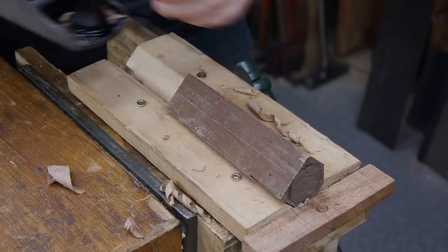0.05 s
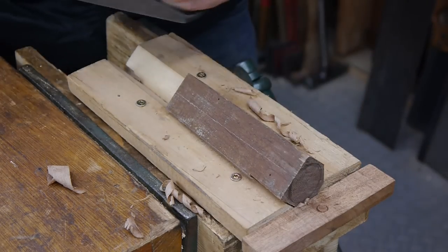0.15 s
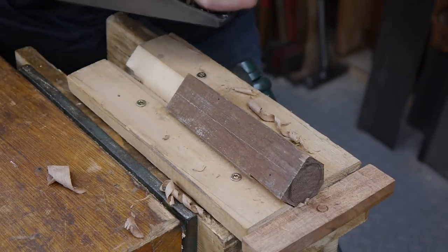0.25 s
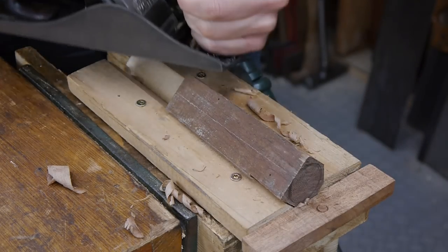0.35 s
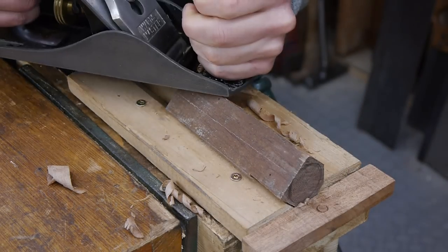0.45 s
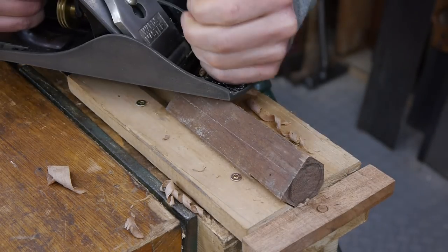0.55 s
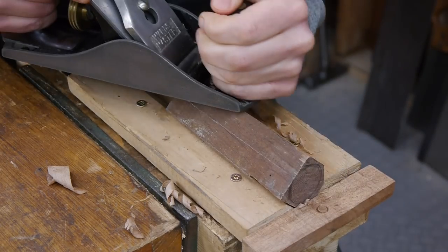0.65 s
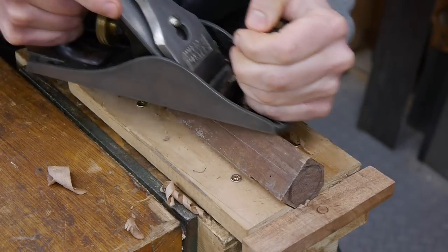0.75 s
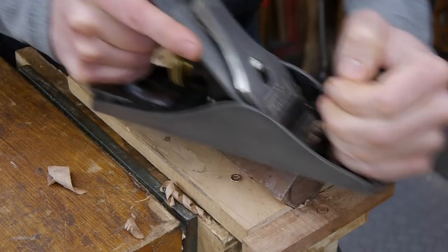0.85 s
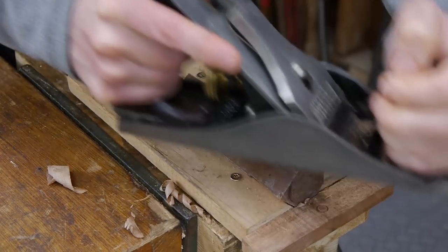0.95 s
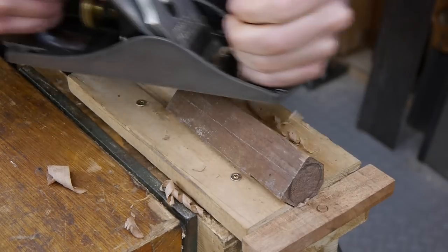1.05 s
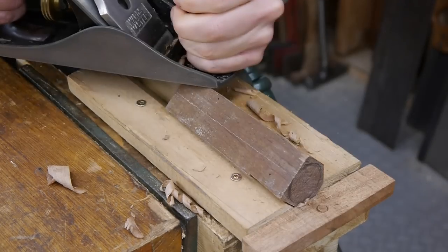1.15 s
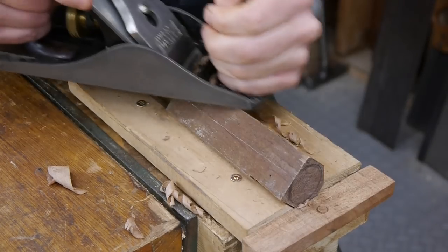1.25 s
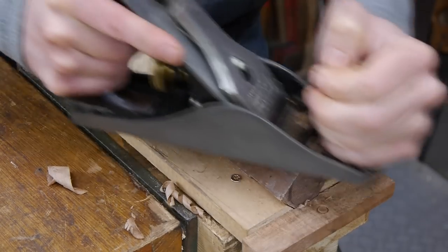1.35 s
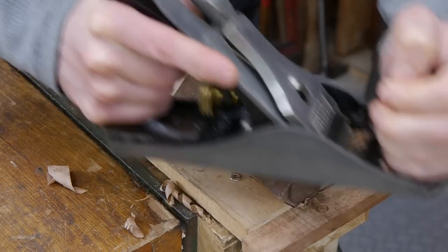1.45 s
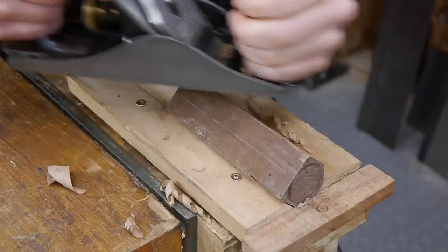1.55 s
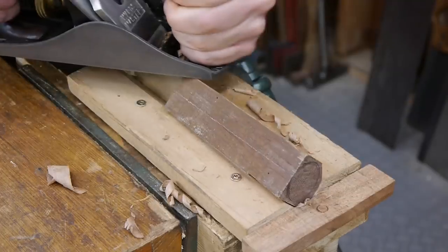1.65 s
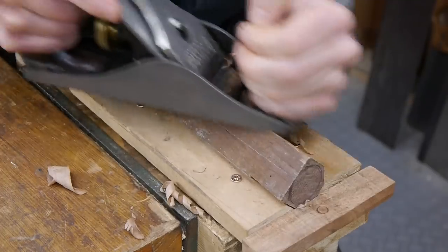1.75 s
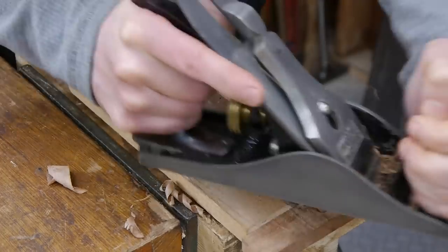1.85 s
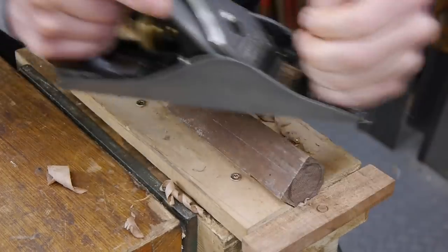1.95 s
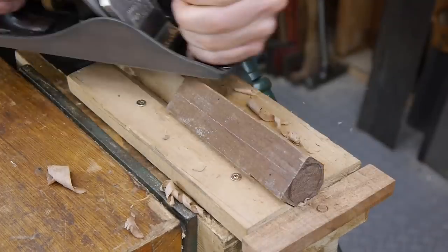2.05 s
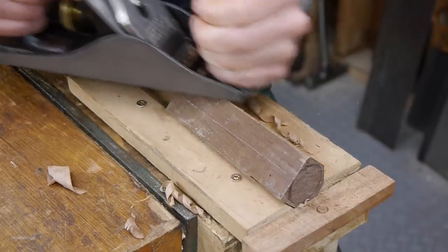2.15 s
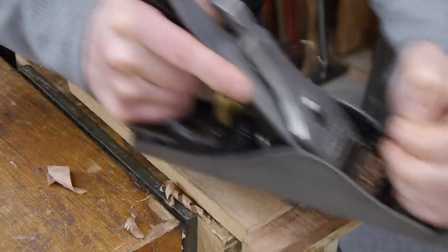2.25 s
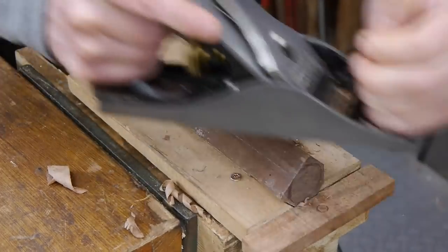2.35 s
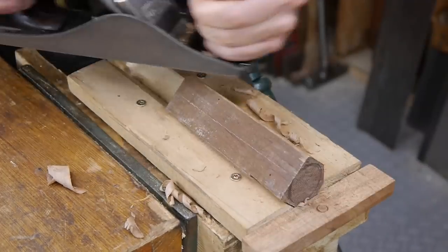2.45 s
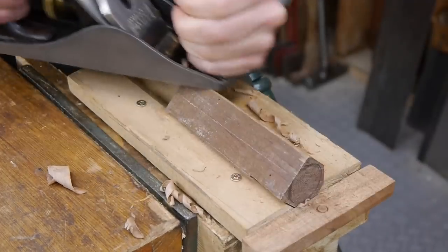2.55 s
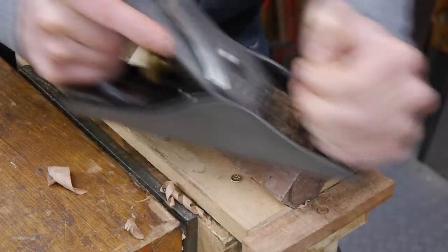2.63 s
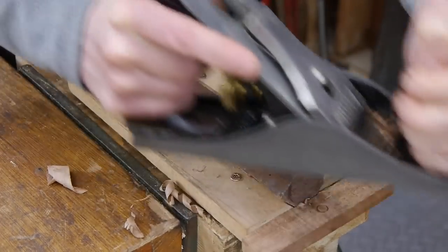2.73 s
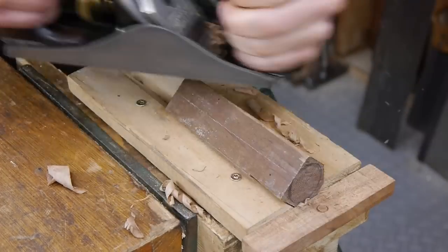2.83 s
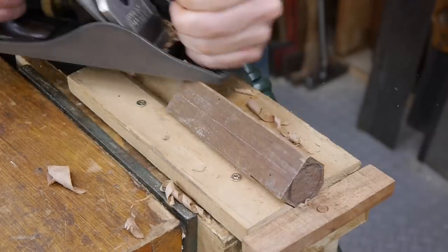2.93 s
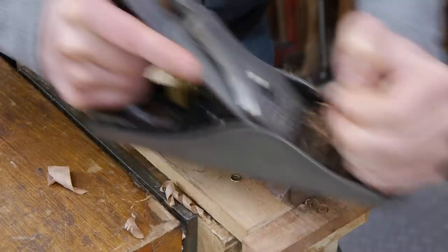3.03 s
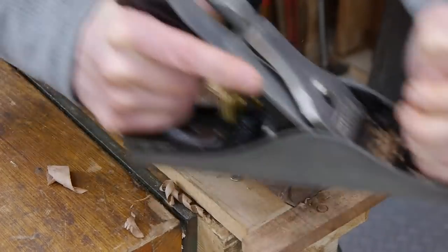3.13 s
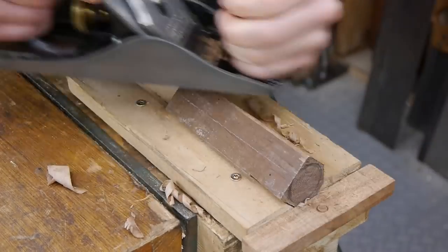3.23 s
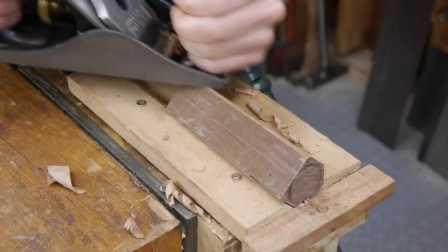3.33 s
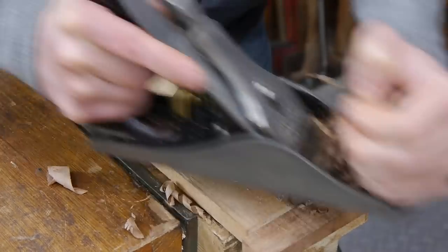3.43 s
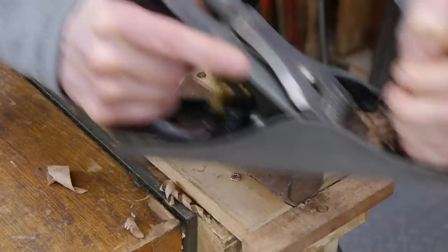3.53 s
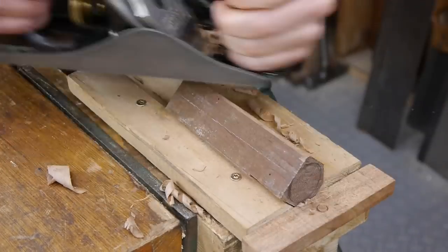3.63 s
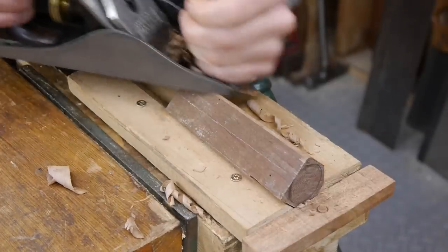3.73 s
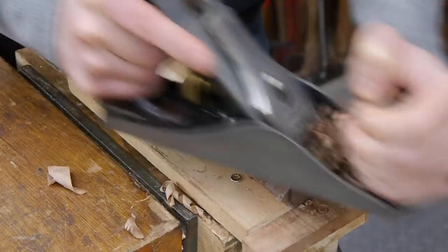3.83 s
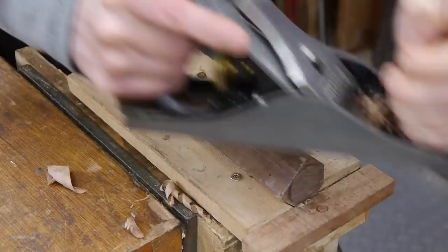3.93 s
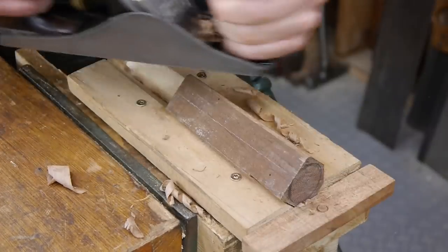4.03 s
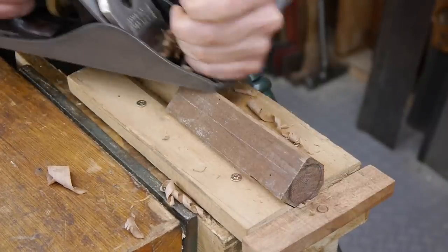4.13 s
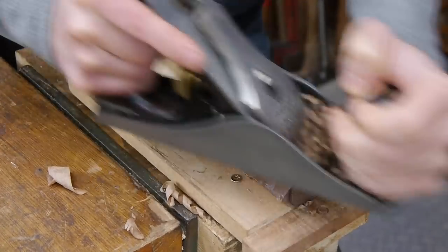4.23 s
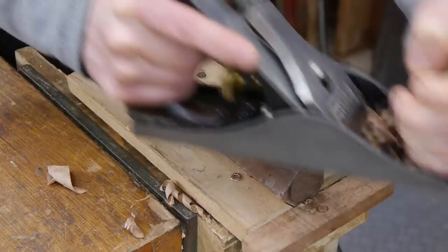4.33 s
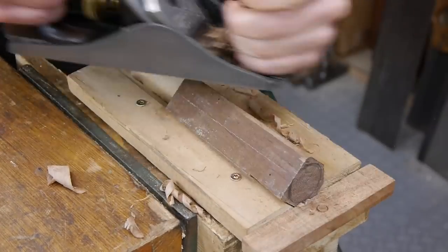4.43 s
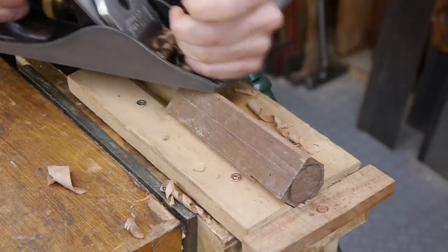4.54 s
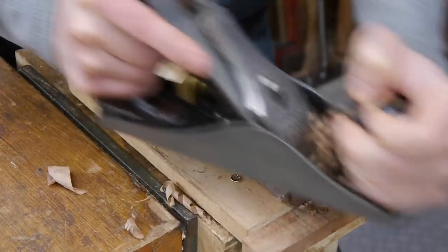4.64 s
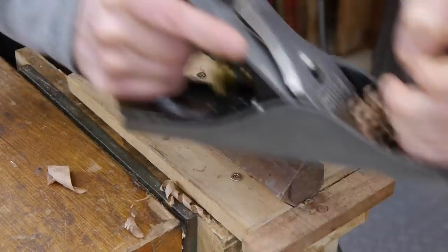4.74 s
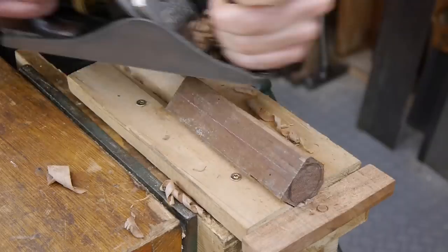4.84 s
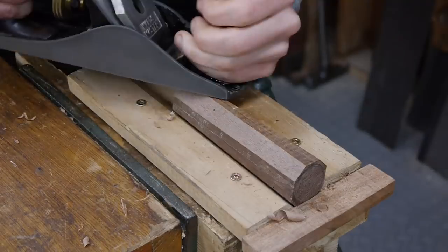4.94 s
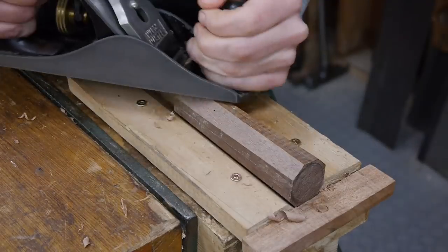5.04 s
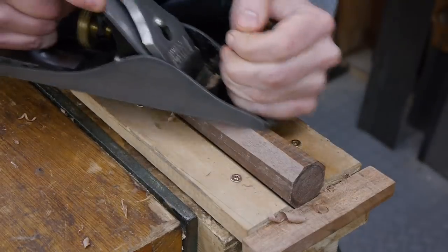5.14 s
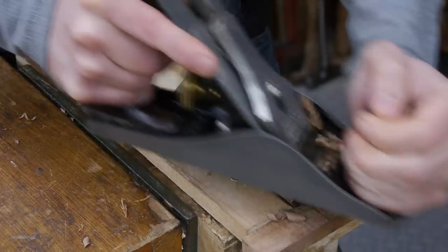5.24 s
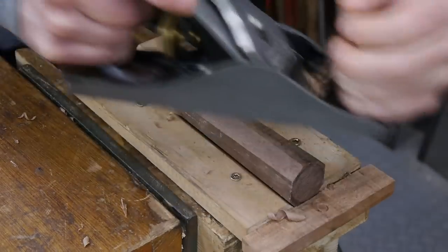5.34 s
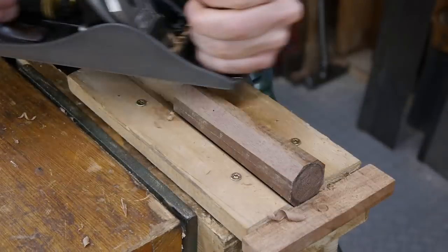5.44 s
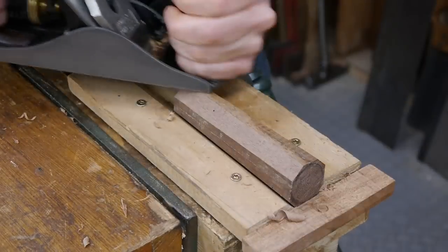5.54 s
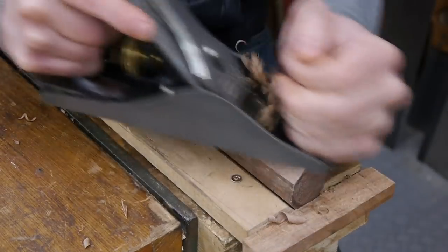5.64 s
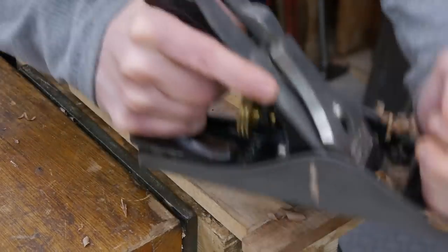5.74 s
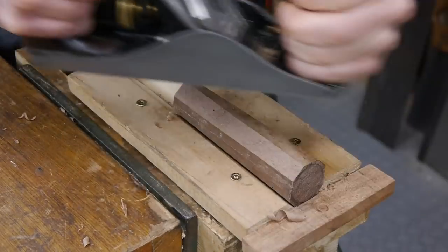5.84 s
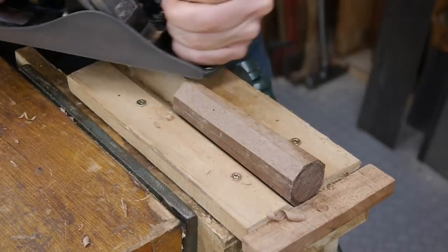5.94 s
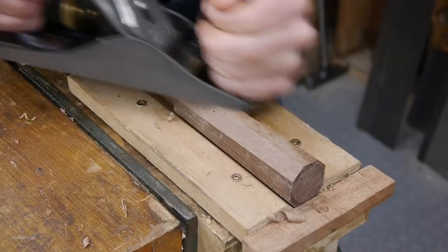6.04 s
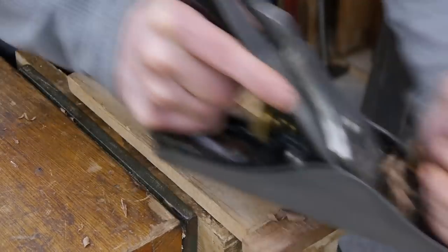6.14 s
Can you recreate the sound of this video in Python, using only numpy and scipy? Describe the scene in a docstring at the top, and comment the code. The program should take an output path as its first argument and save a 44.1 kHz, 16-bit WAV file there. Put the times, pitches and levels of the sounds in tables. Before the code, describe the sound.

Close in a small, fairly dry workshop, a cast-iron hand plane works a hardwood blank. After half a second of quiet, a slow, soft first stroke scrapes and judders, then strokes quicken to over two a second. Each is a clack of iron on wood, brief rub, harsh tearing rasp with bright hiss, dull thump, and knock as the plane lifts.

```python
"""A cast-iron hand plane takes thirteen strokes off a hardwood blank held by a bench stop in a small workshop.
The sole lands with a clack and slides, then the blade bites and tears a shaving; the blank thumps at run-out
and the plane knocks as it rocks, catches, lifts and jolts at the bite. Contacts are noise bursts and random
grains ringing through shared resonances of iron and wood; one judder is a wavering sine. Shifting reflections
and a bench-top glance give the room, over a bed of quiet air and hiss."""
import sys
import numpy as np
from scipy import signal
from scipy.fft import rfft, irfft
from scipy.io import wavfile

SR = 44100
rng = np.random.default_rng(int(sys.argv[2]) if len(sys.argv) > 2 else 0)


def output_pcm(signal):
    """Save a mono or channel-first signal as 16-bit PCM at the path in sys.argv[1].

    Samples are clipped to [-1, 1] before scaling.
    """
    pcm = np.clip(np.atleast_2d(signal).T, -1, 1) * 32767
    wavfile.write(sys.argv[1], SR, np.round(pcm).astype(np.int16))


N = 272538
TIME = np.arange(N) / SR   # s
TAPS = 8192   # filter and burst length in samples
BIN_HZ = np.maximum(np.arange(TAPS // 2 + 1) * SR / TAPS, 1)


def from_db(db):
    """Decibels to gain."""
    return 10 ** (np.asarray(db) / 20)


def rms_one(x):
    """Scale to rms 1."""
    return x / np.sqrt(np.mean(x ** 2) + 1e-20)


def at_hz(points, hz):
    """Read a spectrum table on a log-frequency axis."""
    points = np.array(points)
    return np.interp(np.log(hz), np.log(points[:, 0]), points[:, 1])


def flutter(rate):
    """Random wander of rms 1 through `rate` new values a second."""
    values = rng.standard_normal(N // 20)
    return rms_one(np.interp(TIME * rate, np.arange(N // 20), values))


def shape(x, level_db):
    """Causal (minimum-phase) filter of unit power with the given relative dB in each bin."""
    cepstrum = irfft(np.log(from_db(level_db)))
    # fold the cepstrum forward in time so the filter never rings early
    cepstrum[1:TAPS // 2] *= 2
    cepstrum[TAPS // 2 + 1:] = 0
    response = irfft(np.exp(rfft(cepstrum)))
    return signal.fftconvolve(x, response / np.linalg.norm(response))[:N]


# resonances of blank, bench and iron body, negative lift for a dip: f/Hz, width/Hz, lift level/dB
BODY_MODES = [(138, 5.9, 13.5), (188, 16.4, 7.5), (264.5, 20, 3.5), (309, 26, 4.5), (384.5, 18, 7.5),
              (520.5, 44, 7.5), (601, 15, 2.5), (915.6, 12, 7.5), (1145, 39, 1.5), (1462, 54, 9.5),
              (1539.7, 28, 8), (1581, 54, 6), (1705, 76, 10.5), (1861, 31, 5.5), (1972, 100, 7),
              (2266, 44, 8), (2360, 43, 4), (2417, 73, 4.5), (2517, 88, 5.5), (2745, 88, 5.5),
              (2864, 26, 2.5), (3333, 130, 4), (3519, 31, 3), (3600, 13, -9), (4580, 730, 5.5),
              (5470, 49, -0.5), (6940, 146, 4.5), (8340, 157, 11), (10190, 560, 8), (12120, 410, 6.5),
              (14700, 450, -5)]


def body(force, colour):
    """A contact force of some colour rings through the resonances of plane and wood."""
    level_db = at_hz(colour, BIN_HZ)
    for hz, width, lift_db in BODY_MODES:
        off = (2 * (BIN_HZ - hz) / width) ** 2
        level_db = level_db + 10 * np.log10((off + from_db(lift_db) ** 2) / (off + 1))
    return shape(force, level_db)


def grains(per_s, spread_db):
    """Random tiny fractures of uneven size and either sign; rms 1."""
    size_db = spread_db * np.minimum(rng.exponential(1, N), 4)
    sizes = from_db(size_db) * rng.choice([-1, 1], N)
    return rms_one(sizes * (rng.random(N) < per_s / SR))


def blows(times, levels_db, rise, t60, delay):
    """Each blow is a burst of micro-contacts that swells and dies away (rise, t60 and delay in s)."""
    force, age = np.zeros(N + SR), TIME[:TAPS]
    for s, level_db in zip(times, levels_db):
        start = int((s + delay) * SR)
        swell = 1 - np.exp(-age / rise)
        force[start:start + TAPS] += from_db(level_db - 60 * age / t60) * swell
    return force[:N] * rng.choice([-1, 1], N)


# colour of air and hiss: f/Hz, relative level per Hz/dB
AIR_COLOUR = [(15, -36.5), (25, 2.5), (48, -0.5), (86, -5.5), (359, -3.5), (421, -4), (614, -0.5),
              (666, -3.5), (722, -2), (1200, -2.5), (3930, -10), (7700, -14), (15500, -9)]
# slow level offsets of the background noise: t/s, offset level/dB
BACKGROUND_LEVEL = [(0.43, -1), (0.5, -5), (0.6, -6), (0.65, 0.5)]
BACKGROUND_BASE_DB = -59   # before the offsets above


def background(side_db):
    """Quiet room air and microphone hiss: coloured noise, independent in mid and side, with slow level offsets."""
    mid, side = (shape(rng.standard_normal(N), at_hz(AIR_COLOUR, BIN_HZ)) for channel in range(2))
    level_db = BACKGROUND_BASE_DB + np.interp(TIME, *np.transpose(BACKGROUND_LEVEL))
    return from_db(level_db) * (mid + from_db(side_db) * side * [[1], [-1]])


# the sole lands on the blank, levels before the layer trims:
# t/s, ring level/dB, bench thud level/dB, crack level/dB, rub level of the following slide/dB
LANDINGS = [(0.5094, -32.5, -44.5, -64, -43), (1.1783, -13.5, -35.5, -35.5, -29.5),
            (1.6853, -13.5, -33, -29.5, -23.5), (2.144, -14, -29.5, -32.5, -24),
            (2.5709, -14.5, -30.5, -31.5, -23), (2.9587, -11, -27, -33, -15.5),
            (3.357, -10.5, -26.5, -31.5, -19), (3.7472, -13, -26, -34.5, -20),
            (4.1578, -8, -28.5, -28, -21), (4.5656, -11.5, -29.5, -31.5, -22.5),
            (4.9756, -18.5, -35, -25, -35), (5.5539, -19.5, -34, -39, -24),
            (6.0221, -12.5, -28.5, -30.5, -24.5)]
# colours of the impact layers, each: f/Hz, relative level per Hz/dB
CRACK_COLOUR = [(1000, -28.5), (4000, -13), (6500, 6.5), (8200, 3), (9200, -5.5), (10800, 3), (13000, -4.5),
                (16000, -0.5)]
SNAP_COLOUR = [(800, -23.5), (2000, -8), (2800, -1.5), (3500, 5.5), (4200, 2.5), (5000, -13), (7000, -24.5),
               (10000, -34.5)]
PING_COLOUR = [(3000, -27), (4600, -6.5), (5300, 2.5), (5600, -1), (6100, -12), (6900, -11), (7600, -14.5),
               (8300, -16), (9500, -31.5)]
CLACK_COLOUR = [(100, -40), (400, 1.5), (750, -7.5), (1200, 4), (1500, 3.5), (2000, -3), (2450, 5),
                (2900, -11), (4000, -46), (9000, -40.5)]
THUD_COLOUR = [(50, -45.5), (130, -34), (250, -11.5), (370, -2), (560, -0.5), (750, -6), (1100, -5.5),
               (3000, -56)]


def landings():
    """Iron meets wood: a sharp crack, the ring and ping of the casting, and the bench answering a moment later."""
    s, ring_db, thud_db, crack_db, _ = np.transpose(LANDINGS)
    crack = body(blows(s, crack_db, rise=0.00044, t60=0.024, delay=0.00078), CRACK_COLOUR)
    snap = body(blows(s, ring_db, rise=0.00074, t60=0.021, delay=0.00065), SNAP_COLOUR)
    ping = body(blows(s, crack_db, rise=0.00099, t60=0.019, delay=0.0015), PING_COLOUR)
    ring = body(blows(s, ring_db, rise=0.00023, t60=0.09, delay=0.00059), CLACK_COLOUR)
    thud = body(blows(s, thud_db, rise=0.0016, t60=0.11, delay=0.0028), THUD_COLOUR)
    bright = from_db(7.5) * crack + from_db(-4.5) * snap + from_db(15) * ping
    return bright + from_db(-7) * ring + from_db(6) * thud


# colours of scraped and torn wood, each: f/Hz, relative level per Hz/dB
CUT_COLOUR = [(200, -35), (750, -39.5), (1100, -14), (1500, 2), (2000, -1), (2700, 2), (4200, -10),
              (5500, -13), (9000, -22)]
SHAVING_COLOUR = [(1500, -35), (3500, 6), (5000, -1.5), (7500, -1.5), (9200, -5), (11000, -4), (13000, 0),
                  (13700, -1), (16000, 0)]
GROAN_COLOUR = [(60, -38), (130, -24), (250, -13), (500, 0), (720, -6.5), (1000, 4), (1250, 4.5),
                (1500, -10.5), (3000, -30.5)]


def sliding():
    """The toe of the sole rubs along the wood, and the rub swells as the blade reaches the blank."""
    pressure = np.zeros(N)
    for s, *_, rub_db in LANDINGS:
        bite_s = min(cut[0] for cut in CUTS if cut[0] > s)
        span = slice(int(s * SR), int(bite_s * SR))
        swell_db = 10 * np.exp((TIME[span] - bite_s) / 0.007)
        pressure[span] = from_db(rub_db + swell_db)
    rub = pressure * grains(per_s=5000, spread_db=2.0)
    scrape = from_db(-21.5) * body(rub, CUT_COLOUR)
    hiss = from_db(-35.0) * body(rub, SHAVING_COLOUR)
    groan = from_db(-24) * body(rub, GROAN_COLOUR)
    return scrape + hiss + groan


# the blade in the wood, mid-cut levels before jolts and layer trims: bite t/s, run-out t/s,
# force level on the plane/dB, shaving hiss level/dB, blank groan level/dB, force growth over the cut/dB,
# blank thump level at run-out/dB
CUTS = [(0.705, 0.920, -35.5, -47, -38.5, 19, -25), (1.309, 1.426, -25.5, -38, -28.5, 7, -26.5),
        (1.785, 1.869, -19.5, -30, -28.5, -1, -42), (2.222, 2.292, -19.5, -26.5, -27.5, 0.5, -25.5),
        (2.647, 2.713, -21, -26, -31, 1.5, -26), (3.033, 3.101, -18, -24.5, -27, -7.5, -23.5),
        (3.427, 3.501, -17.5, -25, -30.5, -5.5, -21.5), (3.820, 3.902, -17, -26, -27, -5.5, -18.5),
        (4.229, 4.307, -18.5, -24.5, -27.5, -4.5, -23.5), (4.630, 4.705, -18.5, -24, -28, -0.5, -25),
        (5.144, 5.208, -36, -43.5, -26.5, 10, -48), (5.209, 5.308, -18.5, -29.5, -27.5, -5, -23),
        (5.645, 5.745, -18, -26, -27.5, -4.5, -17.5), (6.107, 6.185, -21, -23, -24.5, -6, -40)]
ARCH_DB = 0.5   # the push is firmest in the middle of a cut
JOLT_S, RELEASE_S = 0.012, 0.0072   # decay times: the edge first digging in, the shaving coming free


def along_cuts(levels_db, growths_db, jolt_db, bite_s):
    """Gain of the cuts: a jolt at the bite, a steady rise or fall under an arched push, a quick release."""
    gain = np.zeros(N)
    for (bite, run_out, *_), level_db, growth_db in zip(CUTS, levels_db, growths_db):
        span = slice(int(bite * SR), int(run_out * SR) + TAPS)
        age = np.maximum(TIME[span] - bite, 0)
        progress = np.minimum(age / (run_out - bite), 1)
        release = np.exp(-np.maximum(TIME[span] - run_out, 0) / RELEASE_S)
        gate = np.minimum(age / bite_s, 1) * release
        push_db = growth_db * (progress - .5) + ARCH_DB * (np.sin(np.pi * progress) - 1)
        gain[span] += gate * from_db(level_db + push_db + jolt_db * np.exp(-age / JOLT_S))
    return gain


# the edge scratches first, then loads the plane, then the blank
HISS_BITE_S, FORCE_BITE_S, GROAN_BITE_S = 0.004, 0.0092, 0.01
JOLT_FORCE_DB, JOLT_HISS_DB, JOLT_GROAN_DB = 0.5, 1, 5.5   # extra level as the edge digs in
SPEED_UP_DB, HISS_FOLLOWS = 7.5, 0.8   # hiss growth as the plane gathers speed, and share of the force's growth
GROAN_SAG_DB = 4.5   # the blank settles against the stop during the cut
TEAR_PER_S, TEAR_SPREAD_DB = 20000, 1.5
WAVER_DB, WAVER_PER_S = 1, 45   # uneven grain along the blank


def cutting():
    """Fibres snap in quick uneven clumps: the plane shakes, the blank groans and the shaving hisses out of the mouth."""
    _, _, force_db, hiss_db, groan_db, growth_db, _ = np.transpose(CUTS)
    clumps = from_db(1.6 * flutter(130) + 1.2 * flutter(700))

    force = along_cuts(force_db, growth_db, JOLT_FORCE_DB, FORCE_BITE_S)
    force = force * rms_one(clumps * grains(per_s=3500, spread_db=0.0))

    tearing = along_cuts(hiss_db, SPEED_UP_DB + HISS_FOLLOWS * growth_db, JOLT_HISS_DB, HISS_BITE_S)
    waver = from_db(WAVER_DB * flutter(WAVER_PER_S))
    tearing = tearing * rms_one(np.sqrt(clumps) * waver * grains(TEAR_PER_S, TEAR_SPREAD_DB))

    dragging = along_cuts(groan_db, np.full(len(CUTS), -GROAN_SAG_DB), JOLT_GROAN_DB, GROAN_BITE_S)
    dragging = dragging * rms_one(clumps * grains(per_s=2500, spread_db=3.0))

    shake = from_db(-0.68) * body(force, CUT_COLOUR)
    hiss = from_db(2.0) * body(tearing, SHAVING_COLOUR)
    groan = from_db(-1.0) * body(dragging, GROAN_COLOUR)
    return shake + hiss + groan


JUDDER_S, JUDDER_LENGTH_S = 0.772, 0.055   # centre of the swell, and its width between 1/e points
JUDDER_HZ, JUDDER_DB = 532, -31   # centre pitch and level, both of which waver


def judder():
    """On the slow first stroke, stick and slip lock briefly onto a resonance of the blank: a short wavering sine."""
    pitch_hz = JUDDER_HZ * (1 + 0.0247 * flutter(120))
    phase = 2 * np.pi * np.cumsum(pitch_hz) / SR
    swell = np.exp(-(2 * (TIME - JUDDER_S) / JUDDER_LENGTH_S) ** 2)
    return from_db(JUDDER_DB + 3.4 * flutter(130)) * swell * np.sin(phase)


def thumps():
    """The blank is pushed against the stop and drops back when the blade lets go."""
    _, run_out, *_, thump_db = np.transpose(CUTS)
    return from_db(1) * body(blows(run_out, thump_db, rise=0.0024, t60=0.081, delay=0.0014), THUD_COLOUR)


# duller knocks of the plane rocking, catching, lifting off and jolting as the blade enters, levels before the
# layer trims: # t/s, ring level/dB, wood level/dB, tick level/dB
KNOCKS = [(0.9842, -17, -32.5, -46), (1.222, -43, -30, -59), (1.5006, -17.5, -32, -54.5),
          (1.728, -19.5, -17.5, -48), (1.83, -13, -39, -27), (1.8614, -3, -30, -29),
          (1.9337, -19.5, -32.5, -57), (2.228, -8, -27, -37), (2.353, -19, -32, -60),
          (2.6594, -5, -32, -35), (2.771, -17, -30.5, -48), (3.1621, -11, -19.5, -54),
          (3.549, -6, -19, -36), (3.591, -20, -38, -61), (3.773, -20.5, -28.5, -45),
          (3.9608, -16.5, -33.5, -47), (4.364, -17.5, -33.5, -54), (4.7547, -11, -25, -47),
          (5.0699, -31, -23.5, -34), (5.332, -13, -20.5, -28), (5.6493, -9, -22.5, -31),
          (5.7959, -7, -17, -32)]
# colours of the iron and wood knocks, each: f/Hz, relative level per Hz/dB
KNOCK_COLOUR = [(200, -38.5), (800, -12.5), (1250, 2), (1520, 9), (2000, -2), (2700, -8), (4000, -24),
                (7000, -28.5), (16000, -40)]
WOOD_COLOUR = [(80, -38.5), (200, -16), (480, -3.5), (700, -5.5), (1200, 4.5), (1600, -13), (2600, -16),
               (5000, -33.5), (16000, -49.5)]


def knocks():
    """Duller contacts rattle the plane and the blank, with a small tick on top."""
    s, ring_db, wood_db, tick_db = np.transpose(KNOCKS)
    ring = body(blows(s, ring_db, rise=0.00018, t60=0.053, delay=0.00025), KNOCK_COLOUR)
    wood = body(blows(s, wood_db, rise=0.001, t60=0.14, delay=0.00039), WOOD_COLOUR)
    tick = body(blows(s, tick_db, rise=0.0004, t60=0.03, delay=0.0003), CRACK_COLOUR)
    return from_db(-4.0) * ring + from_db(1.5) * wood + from_db(-0.5) * tick


# decay of the room: f/Hz, time to fall 60 dB t/s
ROOM_T60 = [(150, 0.26), (500, 0.22), (1400, 0.24), (4000, 0.2), (15000, 0.16)]
# width of the reflections: f/Hz, side-to-mid level/dB
REFLECTION_WIDTH = [(100, -17.5), (300, -44.5), (900, -43.5), (1600, -18.5), (2500, -6), (6000, -7),
                    (15000, -6)]


def reflections(first_echo):
    """Mid and side response of the room from one spot: dense, dying faster in the treble and widest there."""
    age, tails = TIME[:2 * TAPS], 0
    hz = np.maximum(np.arange(TAPS + 1) * SR / (2 * TAPS), 1)
    white = np.exp(2j * np.pi * rng.random((2, TAPS + 1)))
    white[1] *= from_db(at_hz(REFLECTION_WIDTH, hz))
    for low in 2.0 ** np.arange(6, 14):   # octave bands from 64 Hz
        band = irfft(white * ((hz >= low) & (hz < 2 * low)))
        tails = tails + band * from_db(-60 * age / at_hz(ROOM_T60, low * np.sqrt(2)))
    tails = tails * (age > first_echo)
    return tails / np.linalg.norm(tails[0])


# stereo imbalance of the glance: f/Hz, side-to-mid level/dB
GLANCE_WIDTH = [(100, -32.5), (1000, -68), (1800, -15.5), (2700, -10), (6000, -11), (15000, -10)]


def workshop(x, wet_db, glance_db):
    """Plane and arms keep moving, so the room's reflections and a glance off the bench top keep changing."""
    # blend four room responses with wandering weights of constant total power
    spots = np.array([flutter(9) for spot in range(4)])
    spots /= np.linalg.norm(spots, axis=0)
    wet = 0
    for near in spots:
        room = reflections(first_echo=0.0033)
        wet = wet + signal.oaconvolve((x * near)[None], room, axes=1)[:, :N]
    mid, side = from_db(wet_db) * wet
    # a copy about 1.2 ms late, its delay wandering
    glance = np.interp(TIME - .0012 - .0003 * flutter(7), TIME, x, left=0)
    mid = mid + x + from_db(glance_db) * glance
    # the glance reaches the two microphones unequally
    unequal_db = at_hz(GLANCE_WIDTH, BIN_HZ)
    side = side + np.sqrt(np.mean(from_db(unequal_db) ** 2)) * shape(glance, unequal_db)
    return np.array([mid + side, mid - side])


RADIATION_HZ = 105   # plane and blank are too small to radiate deep bass


def scene():
    """All sounds of the plane in the room, over its background."""
    plane = landings() + sliding() + cutting() + judder() + thumps() + knocks()
    radiated = signal.sosfilt(signal.butter(2, RADIATION_HZ, "high", fs=SR, output="sos"), plane)
    return background(side_db=-5.0) + workshop(radiated, wet_db=-7.5, glance_db=-13)


CUTOFF_HZ = 15800


def record(dry):
    """The top is cut steeply."""
    return signal.sosfilt(signal.ellip(12, .1, 90, CUTOFF_HZ, fs=SR, output="sos"), dry)


dry = scene()
out = record(dry)
output_pcm(out)
```